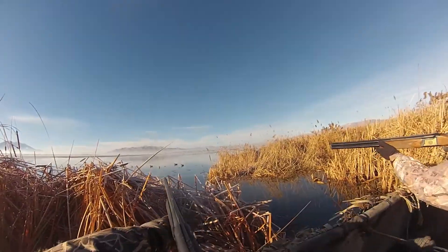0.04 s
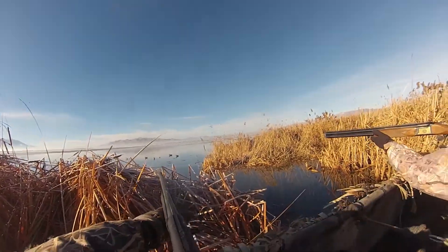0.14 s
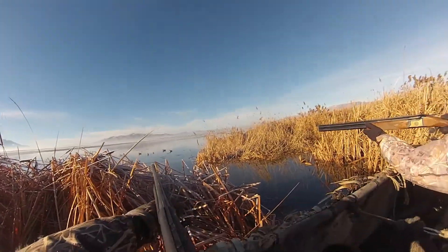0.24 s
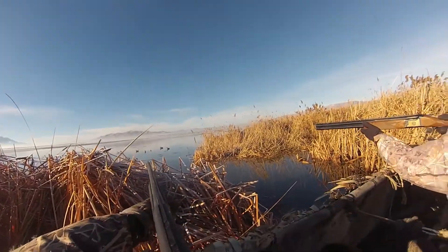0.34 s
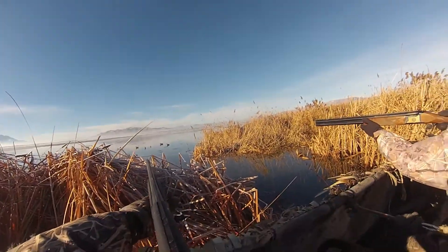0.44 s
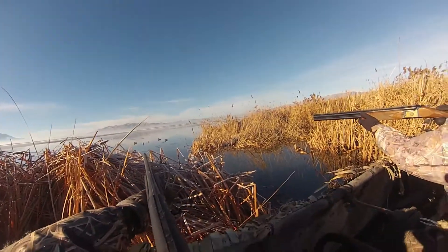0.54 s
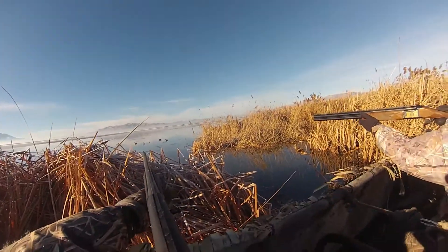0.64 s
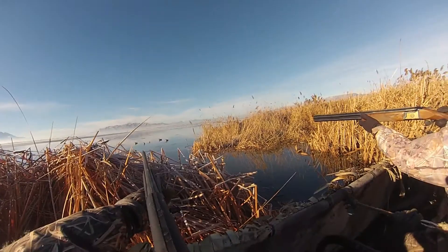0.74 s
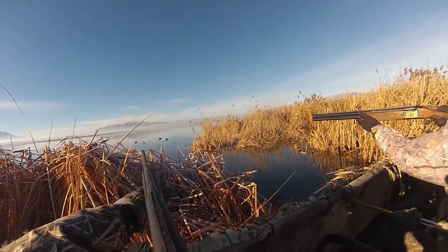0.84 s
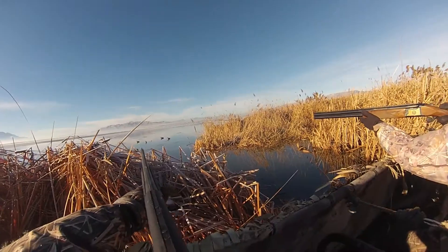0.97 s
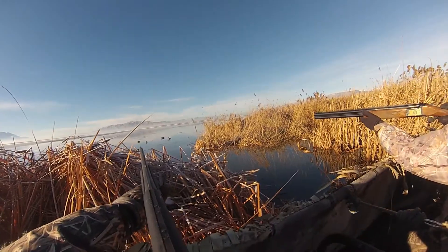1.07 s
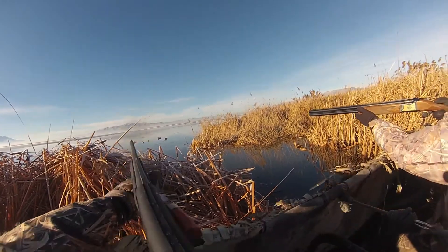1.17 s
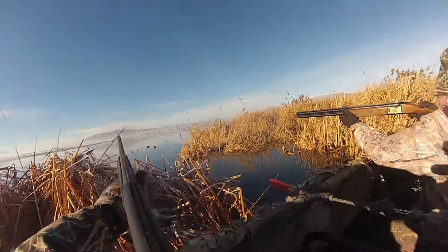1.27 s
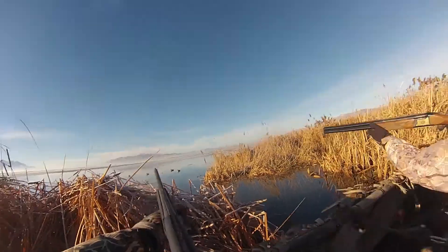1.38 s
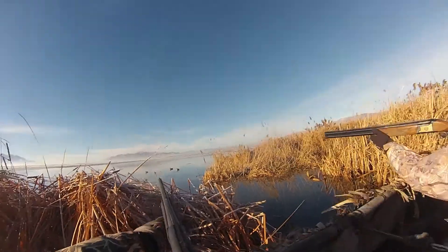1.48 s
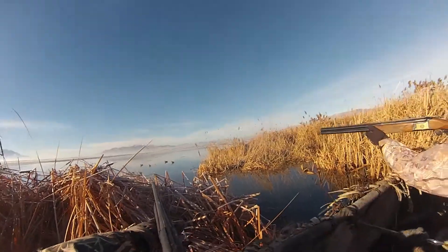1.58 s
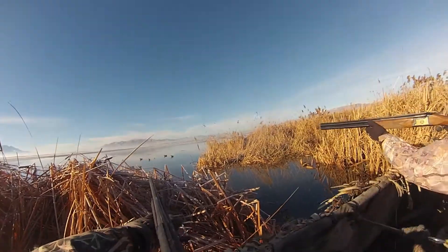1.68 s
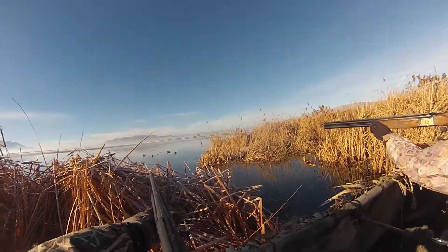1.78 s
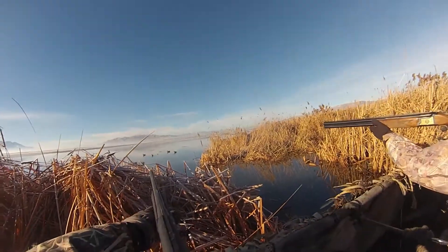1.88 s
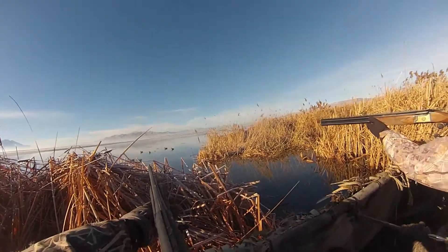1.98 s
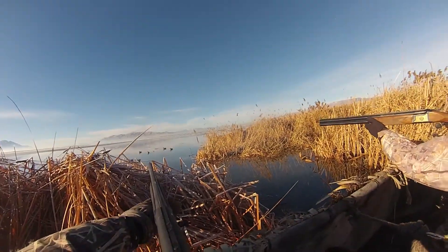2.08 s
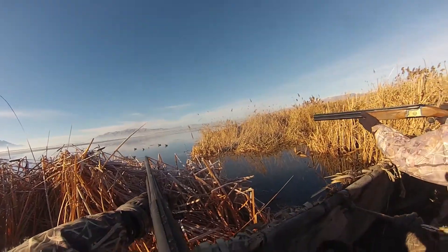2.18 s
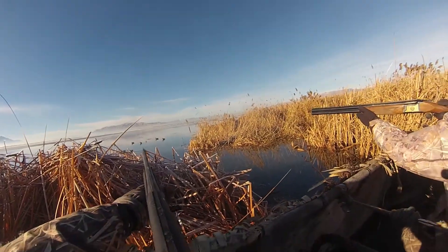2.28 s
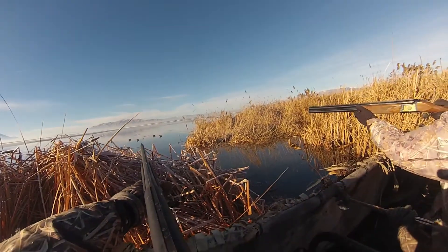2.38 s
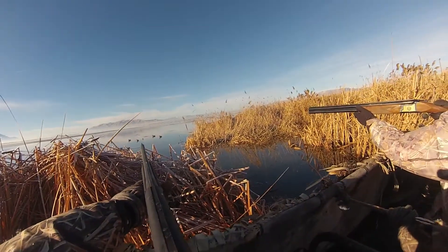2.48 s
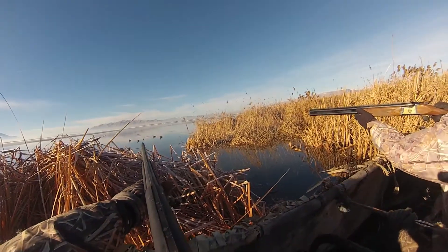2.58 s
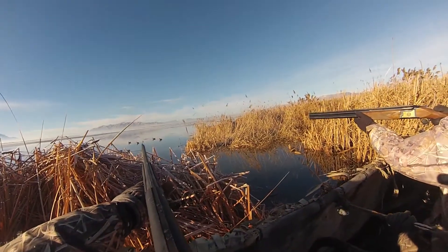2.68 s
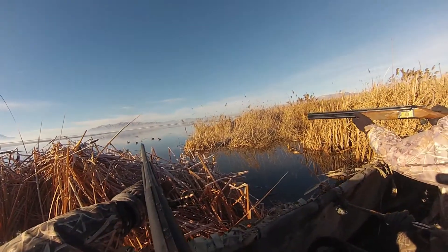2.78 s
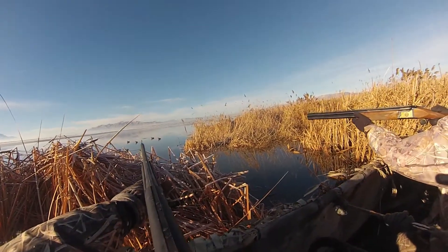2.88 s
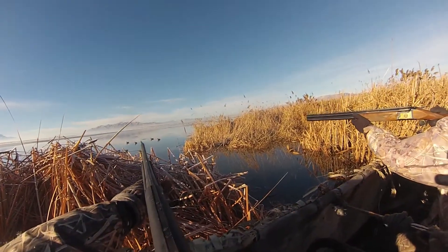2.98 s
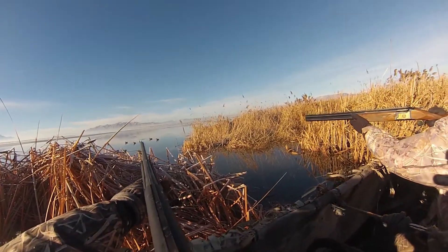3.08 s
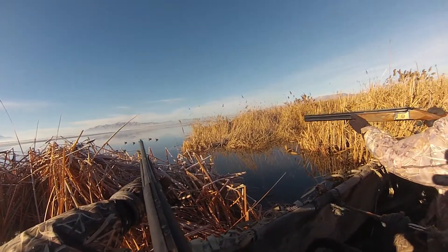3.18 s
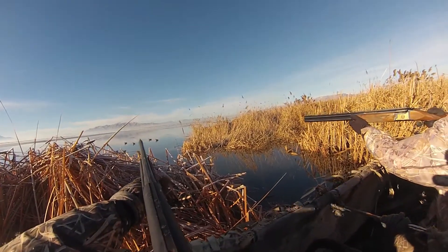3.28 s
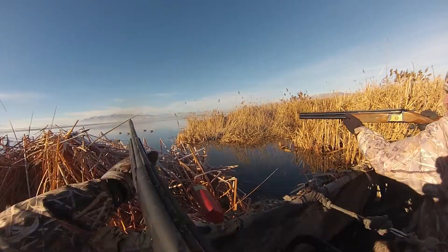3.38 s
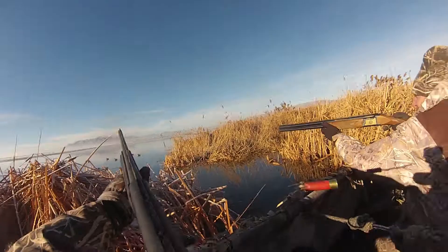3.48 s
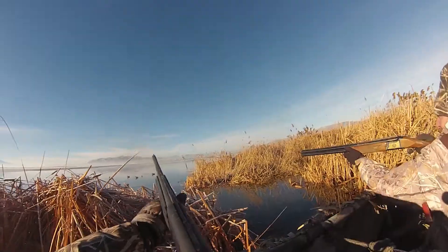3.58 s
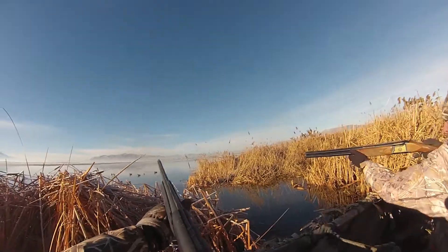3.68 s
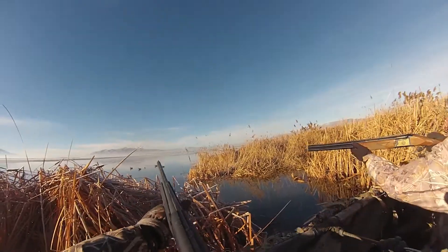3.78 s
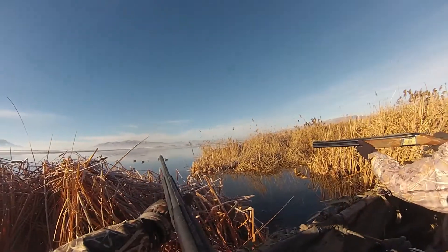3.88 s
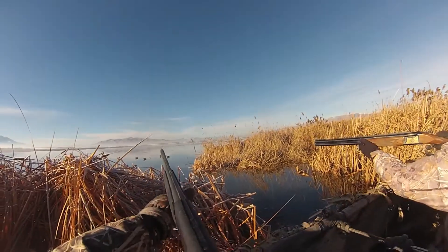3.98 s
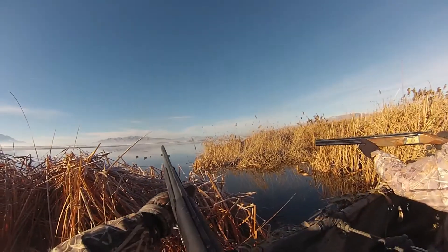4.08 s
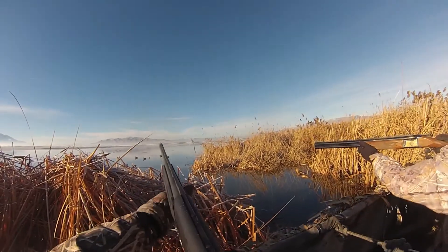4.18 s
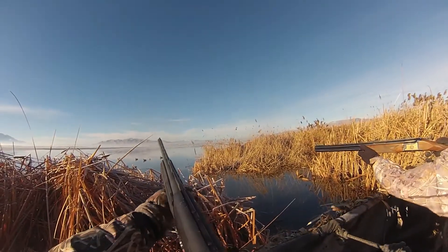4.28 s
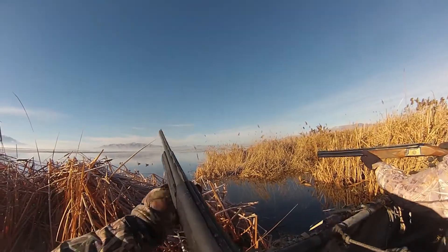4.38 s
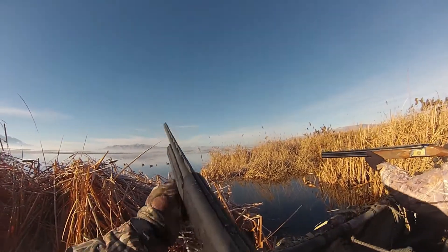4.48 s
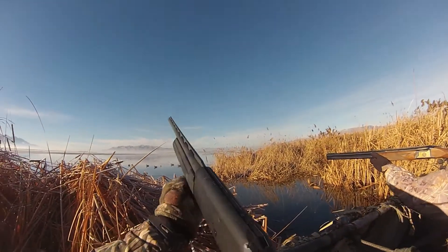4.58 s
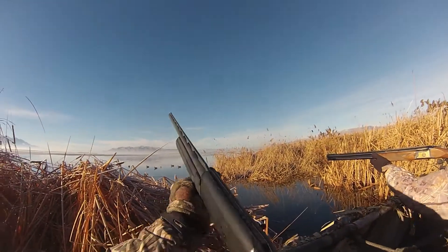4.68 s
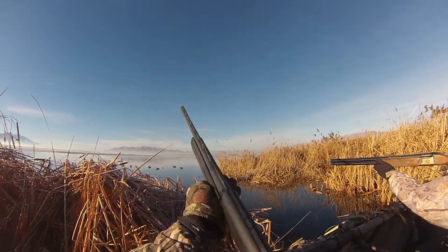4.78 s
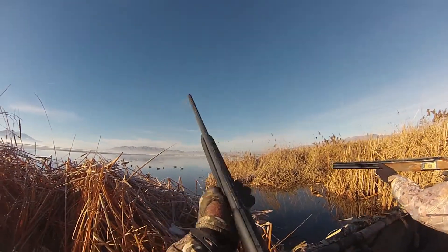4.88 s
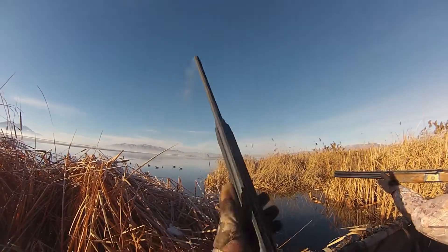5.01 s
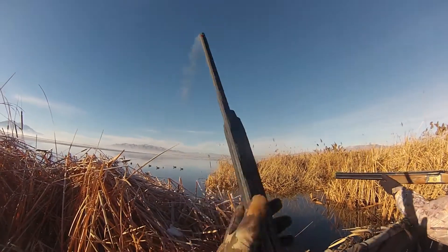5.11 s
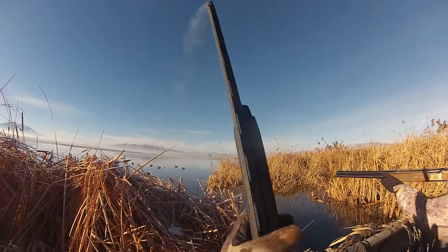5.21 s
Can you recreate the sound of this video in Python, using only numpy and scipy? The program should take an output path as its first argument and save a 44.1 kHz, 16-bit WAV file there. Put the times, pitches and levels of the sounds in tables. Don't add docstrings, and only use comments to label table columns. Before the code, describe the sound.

Over a fading echo and a shell knocking in a boat, two near-merged shotgun blasts crack out, then another, each rolling away across the marsh.

```python
import sys
import numpy as np
from scipy import signal
from scipy.fft import rfft, irfft, next_fast_len
from scipy.io import wavfile
from scipy.ndimage import uniform_filter1d

SR = 44100
rng = np.random.default_rng(int(sys.argv[2]) if len(sys.argv) > 2 else 0)


def field_ratio(decibels):
    return 10 ** (np.asarray(decibels, dtype=float) / 20)


def pcm_store(signal):
    levels = np.round(np.clip(np.atleast_2d(signal), -1, 1) * 32767)
    wavfile.write(sys.argv[1], SR, levels.astype(np.int16).T)


N = 231425
T = np.arange(N) / SR
FAST = next_fast_len(N)


def unit(x):
    return x / np.sqrt(np.mean(x ** 2))


def add(out, s, x):
    i = int(s * SR)
    out[i:i + len(x)] += x[:N - i]


def decay(t, t60):
    return np.exp(-np.log(1000) * t / t60)


def colour(x, points):
    hz, db = np.transpose(points)
    f = np.arange(len(x) // 2 + 1) * SR / len(x) + 1
    return irfft(rfft(x) * field_ratio(np.interp(np.log(f), np.log(hz), db)), len(x))


def walk(rate):
    k = int(SR / rate)
    steps = np.repeat(rng.standard_normal(N // k + 1), k)
    return 1.3 * uniform_filter1d(uniform_filter1d(steps, k), k)[:N]


def grains(size, spread_db):
    sizes_db = spread_db * np.minimum(rng.exponential(size=size), 5)
    return unit(rng.standard_normal(size) * field_ratio(sizes_db))


def bursts(rows, shape, spread_db, treble_life):
    out, t = np.zeros(N), T[:8192]
    treble = [(1500, -31), (4000, -1.5), (11000, -2.5), (15000, -14)]  # (frequency [Hz], level [dB])
    for s, db, hold_ms, t60, hz, treble_db in rows:
        after = np.maximum(t - hold_ms / 1000, 0)
        body = unit(colour(grains(len(t), spread_db), np.multiply(shape, [hz, 1])))
        top = unit(colour(grains(len(t), spread_db), treble))
        mix = body * decay(after, t60) + field_ratio(treble_db) * top * decay(after, t60 * treble_life)
        add(out, s, field_ratio(db) / 2 * np.minimum(t / .0005, 1) * mix)
    return out


def air():
    # (frequency [Hz], density [dB per Hz])
    air_spectrum = [(12, -32), (20, -1.5), (44, 1), (154, -8), (182, -7), (336, -22), (497, -15),
                    (973, -31.5), (2010, -34), (4520, -40), (10800, -42), (15900, -54)]
    # (time [s], level of the lows [dB])
    wind = [(0, -0.5), (1, 1.5), (2, -2.5), (3, 0.5), (4, 0), (4.5, 0.5), (4.9, 2), (5.25, -0.5)]
    bed = unit(colour(rng.standard_normal(FAST), air_spectrum))[:N] * field_ratio(-65.5)
    low = signal.sosfiltfilt(signal.butter(2, 700, fs=SR, output="sos"), bed)
    flutter_db = np.interp(T, *np.transpose(wind)) + 1.6 * walk(12)
    return low * field_ratio(flutter_db) + (bed - low) * field_ratio(-0.5)


def sleeves():
    # (start [s], length [s], level [dB], treble [dB])
    scuffs = [
        (4.327, 0.97, -79, -5),
        (4.44, .09, -77, -6),
        (4.53, 0.044, -78, 3),
        (4.67, 0.217, -68.5, -8),
        (5.0, 0.079, -78, -9),
    ]
    edge_s = 0.058
    cloth = [(250, -1), (500, 3.5), (1100, -6.5), (2600, -8.0),
             (3800, -12.5), (9000, -10), (15500, -20)]
    dull_power, bright_power = np.zeros(N), np.zeros(N)
    for s, length, db, treble_db in scuffs:
        inside = np.minimum(T - s, s + length - T)
        shape = np.clip(inside / edge_s + .5, 0, 1) * field_ratio(db)
        dull_power += shape ** 2
        bright_power += (shape * field_ratio(treble_db)) ** 2
    rub = colour(grains(FAST, spread_db=2.5), cloth)[:N]
    low = signal.sosfilt(signal.butter(2, 4500, fs=SR, output="sos"), rub)
    dull = unit(low) * field_ratio(5.5) * np.sqrt(dull_power)
    bright = unit(rub - low) * field_ratio(3.0) * np.sqrt(bright_power)
    return (dull + bright) * field_ratio(1.302 * walk(90) + .6 * walk(25))


def squeak():
    # (frequency [Hz], frequency [Hz])
    pitch_hz = (620, 860)
    length = .035 * SR
    out, u = np.zeros(N), np.arange(int(length)) / length
    phase = 2 * np.pi * np.cumsum(np.interp(u, [0, 1], pitch_hz)) / SR
    add(out, 4.865, field_ratio(-66) * np.sin(np.pi * u) * np.sin(phase))
    return out


def contacts():
    # (time [s], peak [dB], centre [Hz], kind)
    clicks = [(.034, -76, 9000, "tick"), (.084, -50, 1700, "chip"), (.238, -28, 1100, "body"),
              (0.2386, -44.5, 4000, "snap"), (0.4556, -44.5, 1570, "body"), (.456, -61, 4280, "snap"),
              (.514, -65, 1102, "knock"), (1.7095, -30.5, 1330, "clack"), (1.868, -61, 6000, "tick"),
              (1.89, -54, 1500, "knock"), (2.0985, -38.5, 1640, "knock"), (1.711, -34.5, 422, "thud"),
              (2.1, -42, 455, "thud"), (2.162, -67.5, 7010, "tick"), (2.177, -67, 4000, "tick"),
              (2.373, -69, 4000, "tick"), (3.172, -68, 5040, "tick"), (3.975, -25.5, 2170, "chip"),
              (3.979, -22, 1350, "body"), (4.011, -49, 2200, "tap"), (4.105, -69, 6000, "snap"),
              (4.165, -44, 2580, "tap"), (4.168, -45, 1400, "thud"), (4.316, -58, 3300, "snap"),
              (4.428, -54, 1100, "knock"), (4.657, -63, 9027, "tick"), (5.02, -54, 2500, "tap"),
              (5.035, -63.5, 2300, "scrape")]
    # (time [s], peak [dB], centre [Hz])
    thuds = [
        (.262, -41, 450),
        (.47, -50, 450),
        (3.995, -40, 300),
        (4.307, -51, 600),
        (4.38, -58, 350),
    ]
    contact = {"tick": (0.92, 0.011, -4), "chip": (2.5, .016, -27), "snap": (3.9, 0.037, -17),
               "tap": (3.6, .045, -6), "body": (3, 0.077, -29), "clack": (6, .065, -6),
               "knock": (6, .08, -14), "thud": (9.7, 0.076, -40), "scrape": (49, 0.09, -19)}
    # (multiple of the centre [1], level [dB])
    shell_shape = [(.06, -48), (.3, -6), (.6, -3), (1, -0.5), (1.7, -10.5), (2.4, -21.5), (6, -53)]
    rows = []
    for s, db, hz, kind in clicks + [(*thud, "thud") for thud in thuds]:
        hold_ms, t60, treble_db = contact[kind]
        rows.append((s, db, hold_ms, t60, hz, treble_db))
    return bursts(rows, shell_shape, spread_db=3.5, treble_life=.55)


def hull():
    # (time [s], peak [dB], rattle [ms])
    knocks = [
        [(.238, -19.5, 16)],
        [(.456, -34, 6.2), (0.467, -41, 5.2)],
        [(3.978, -14.5, 10.2)],
        [(4.304, -41.5, 18)],
        [(.514, -46, 44)],
    ]
    # (frequency [Hz], level [dB], t60 [s])
    panels = [
        [(381, -0.5, 0.14), (416, 2.5, 0.053), (503, -7, 0.12), (615, -6, 0.041), (898, -2, 0.053),
         (1240, -22, .04), (1720, -1.5, 0.037), (1873, -13, .04), (2720, -17, 0.033), (4070, -14, .025)],
        [(392, -21, .035), (466, 18.5, 0.052), (540, -3, 0.034), (650, -14, 0.025), (1710, -7, .03),
         (2270, -14, .025)],
        [(260, -18, 0.029), (501, -22, 0.04), (537, -3.5, 0.099), (586, 2, 0.021), (780, -9.5, 0.03),
         (1134, -20, 0.12), (1550, -14, 0.037), (2114, -8.5, 0.031), (2750, -20.5, 0.04)],
        [(234, 6, 0.039), (485, 1, 0.042)],
        [(400, -4, .035), (488, 1, 0.057), (614, -12, 0.027)],
    ]
    out, t, t_hit = np.zeros(N), T[:8192], T[:2048]
    for hits, modes in zip(knocks, panels):
        ring = sum(field_ratio(g) * np.sin(2 * np.pi * hz * t) * decay(t, t60) for hz, g, t60 in modes)
        band = signal.butter(3, [0.816 * modes[0][0], 5000], "band", fs=SR, output="sos")
        for s, db, rattle_ms in hits:
            force = grains(2048, spread_db=3.0) + 7.3 * signal.unit_impulse(2048)
            force = force * np.exp(-(t_hit / (rattle_ms / 1500)) ** 2)
            knock = signal.sosfilt(band, signal.fftconvolve(force, ring))
            add(out, s, field_ratio(db) * knock / np.abs(knock).max())
    return out


def returned(hz, late):
    # (frequency [Hz], level [dB], fade [dB per s])
    reeds = [(250, -45, 110), (570, -41.5, 140), (1500, -37, 110), (8000, -39, 165)]
    # (frequency [Hz], level [dB], time to lose 10 dB [s], delay of peak [s])
    bank = [(120, -43, .17, .17), (250, -42, .22, .18), (570, -36, .16, .18), (769.6, -41, .11, .165),
            (1500, -42.5, .083, .155), (3200, -49, .07, .145), (6000, -66, .12, .16),
            (13000, -66, .13, .16)]
    # (frequency [Hz], level [dB], fade [dB per s])
    marsh = [(120, -48, 25), (250, -47, 26), (567, -52.5, 34), (900, -58.5, 33), (1500, -64, 32),
             (8000, -79, 26)]

    def at_band(table):
        f, *columns = np.transpose(table)
        return [np.interp(np.log(hz), np.log(f), column) for column in columns]

    reed_db, reed_fade = at_band(reeds)
    bank_db, bank_s, bank_late = at_band(bank)
    marsh_db, marsh_fade = at_band(marsh)
    off = late - bank_late
    bank_width_s = np.where(off < 0, .075, bank_s)
    arrived = np.clip(late / .18, 0, 1) ** 2
    power = field_ratio(2 * (reed_db - reed_fade * late))
    power = power + field_ratio(2 * (bank_db - 10 * np.abs(off / bank_width_s) ** 1.7))
    power = power + arrived * field_ratio(2 * (marsh_db - marsh_fade * late))
    return power * (late >= 0) * (late < 1.2)


def echo():
    # (time [s], low level [dB], treble level [dB])
    shots = [
        (-.45, 2.5, 2.5),
        (1.25, -5.5, -1),
        (1.349, 0.5, 0.5),
        (3.44, 1, 1.5),
    ]
    step, f = T[::64], np.arange(FAST // 2 + 1) * SR / FAST
    out, patchy, noise = np.zeros(N), walk(45)[::64], rfft(rng.standard_normal(FAST))
    for hz in 40 * 2 ** (np.arange(26) / 3):
        db = -5 * max(np.log2(hz / 8000), 0) - min(15 * max(np.log2(250 / hz), 0), 25)
        db = db + 3 * np.exp(-(np.log2(hz / 400) / .45) ** 2)
        share = np.clip(np.log2(hz / 500) / 2, 0, 1)
        power = 0
        for s, low, high in shots:
            power = power + returned(hz, step - s) * field_ratio(2 * (db + low + share * (high - low)))
        patches = .9 * patchy + 1.1 * walk(30)[::64]
        gain = np.sqrt(power) * field_ratio(-5 + (0.91 + .15 * share) * patches)
        window = np.interp(f, hz * 2 ** (np.arange(-1, 2) / 3), [0, 1, 0])
        band = irfft(noise * window ** .5, FAST)[:N]
        out += unit(band) * np.interp(T, step, gain)
    return out


def lock():
    # (time [s], ring level [dB])
    hammer_falls = [
        (1.243, -38),
        (3.431, -29),
    ]
    # (frequency [Hz], level [dB], t60 [s])
    lock_modes = [(1200, 0, .1), (3470, -2, 0.063)]
    out, t = np.zeros(N), T[:4096]
    ring = sum(field_ratio(db) * np.sin(2 * np.pi * hz * t) * decay(t, t60) for hz, db, t60 in lock_modes)
    for s, fall_db in hammer_falls:
        add(out, s, field_ratio(fall_db) * ring)
    return out


def muzzle():
    # (time [s], peak [dB], push [ms], thump level [dB], thump [Hz])
    pushes = [
        (1.2559, -2.5, .6, -21, 104.8),
        (1.3512, 4.5, .5, -19.5, 119.6),
        (1.3532, -29.5, .3, -7.5, 430.2),
        (3.4445, -6, .7, -18.5, 100.3),
    ]
    out, t = np.zeros(N), T[:8192]
    for s, db, push_ms, thump_db, hz in pushes:
        u = t / (push_ms / 1000)
        push = field_ratio(db) * (1 - u) * np.exp(-u / 1.2)
        thump = field_ratio(thump_db) * np.sin(2 * np.pi * hz * t) * np.exp(-t * np.sqrt(hz) / 0.12)
        add(out, s, thump - push)
    return out


def gas():
    gas_kinds = {"hammer": (6.5, 0.22, 1300, -14), "primer": (2, 0.06, 3700, -4.5),
                 "muzzle": (2.5, 0.01, 1140, -1), "water": (3.5, 0.0114, 2900, 0),
                 "smoke": (3, 0.0765, 1150, -6), "bolt": (2.5, 0.0546, 3000, -3),
                 "bank": (4, 0.0653, 2100, -20), "hull": (9, .04, 380, -40),
                 "crack": (1.7, 0.013, 2500, 1.5)}
    # (multiple of the centre [1], level [dB])
    gas_shape = [(.03, -27), (.25, -6.5), (.67, -5), (1, -0.5), (4, -23.5), (8, -61)]
    # (delay [s], peak [dB], kind)
    near_gun = [
        (-.0075, -33, "hammer"),
        (-.0028, -21, "primer"),
        (0, 3, "muzzle"),
        (.0043, 4, "water"),
        (.0093, -12.5, "smoke"),
        (.0333, -24, "bolt"),
        (.14, -31, "bank"),
        (.001, -12, "hull"),
    ]
    # (delay [s], peak [dB], kind)
    other_gun = [
        (0, .5, "crack"),
        (.0036, -13, "smoke"),
        (0.1308, -31, "bank"),
    ]
    near_shots = [
        1.25,
        3.4395,
    ]
    shots = [(s, near_gun) for s in near_shots] + [(1.3484, other_gun)]
    rows = [(s + late, db, *gas_kinds[kind]) for s, course in shots for late, db, kind in course]
    return bursts(rows, gas_shape, spread_db=3.0, treble_life=.7)


def scene():
    background = air() + sleeves() + squeak()
    shells = contacts() + hull()
    guns = lock() + muzzle() + gas()
    return (background + shells + echo() + guns)[None]


def roll_off(x):
    return signal.sosfilt(signal.butter(12, 16060, fs=SR, output="sos"), x)


def record(dry):
    x = signal.sosfilt(signal.butter(1, 12, "high", fs=SR, output="sos"), dry)
    x = .9 * np.tanh(x / .9)
    x = signal.sosfilt(signal.ellip(8, .2, 70, 15800, fs=SR, output="sos"), x)
    return roll_off(x)


dry = scene()
out = record(dry)
pcm_store(out)
```